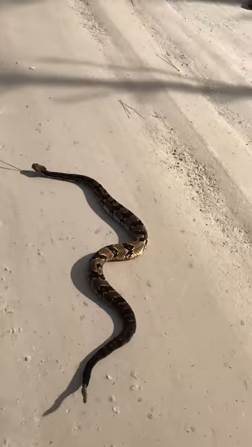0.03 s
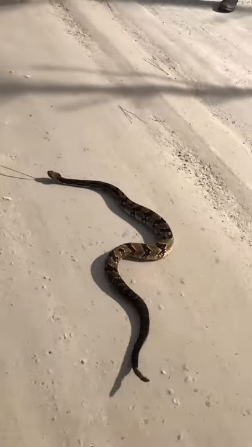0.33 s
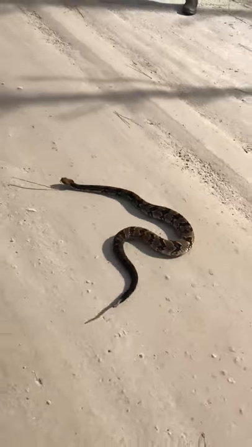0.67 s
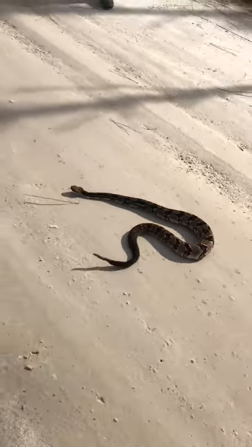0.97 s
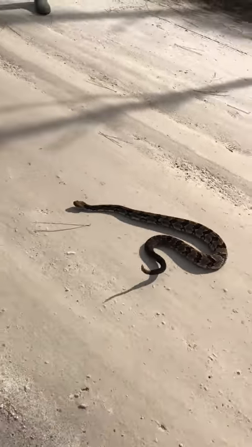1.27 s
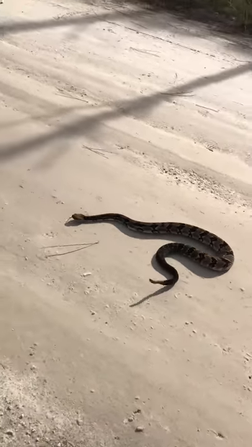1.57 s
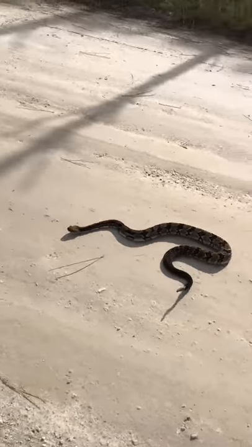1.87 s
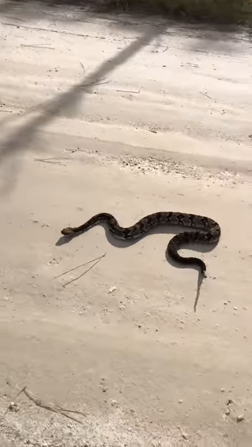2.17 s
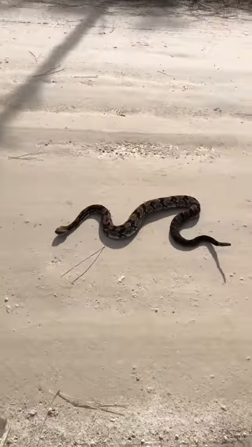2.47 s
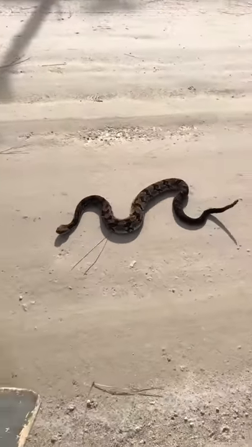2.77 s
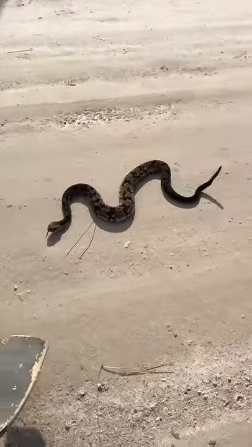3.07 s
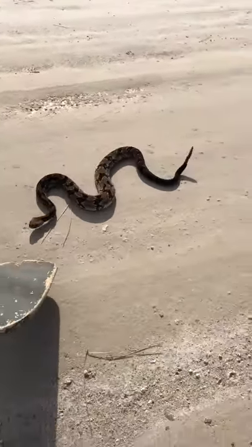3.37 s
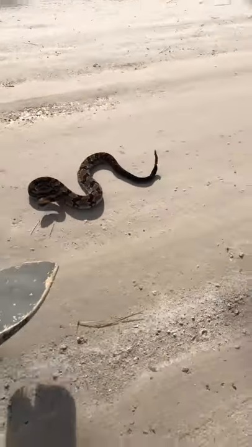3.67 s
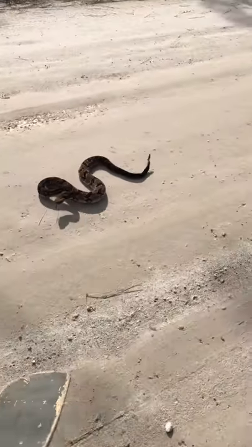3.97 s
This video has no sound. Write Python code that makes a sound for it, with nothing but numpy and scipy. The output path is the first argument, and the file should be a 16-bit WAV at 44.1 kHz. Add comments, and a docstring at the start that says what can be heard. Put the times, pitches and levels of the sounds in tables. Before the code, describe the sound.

A rattlesnake's rattle buzzes dry and high for the whole four seconds, its tone shifting slightly and easing a little near the end. An engine idles faintly underneath in the open air. Light scuffs on sand come at about 1.1, 1.9, 2.5 and 3.1 seconds. A few soft, dull knocks are scattered from 0.9 seconds on, the clearest near 1.5 and 3.7 seconds.

```python
"""Rattlesnake on a dirt road.

A rattlesnake buzzes its tail while it crawls and coils. At each turn of the tail the hollow
segments click together; their colour shifts with the tail's pose. An engine idles faintly nearby,
its beats ringing the exhaust. A few scuffs on the sand and soft knocks pass close by."""
import sys
import numpy as np
from scipy import signal
from scipy.fft import rfft, irfft, next_fast_len
from scipy.io import wavfile
from scipy.ndimage import uniform_filter1d, map_coordinates

SR = 44100
rng = np.random.default_rng(int(sys.argv[2]) if len(sys.argv) > 2 else 0)


def store_pcm(level_fs):
    """Save levels as 16-bit WAV."""
    pcm = np.round(np.clip(level_fs, -1, 1) * 32767).astype(np.int16)
    wavfile.write(sys.argv[1], SR, np.atleast_2d(pcm).T)


N = 176400

# dull body of disturbed sand (frequency [Hz], relative density [dB])
SAND_SPECTRUM = [(100, -18), (250, 9.5), (420, 13.5), (700, 7), (1100, 7), (1700, -11), (4000, -5),
                 (12000, -55)]


def amp(db):
    """Decibels to gain."""
    return 10 ** (np.asarray(db) / 20)


def unit(x):
    """Scale to rms 1."""
    return x / np.sqrt(np.mean(x ** 2) + 1e-20)


def along(points, hz):
    """(Hz, value) points on a log axis."""
    f, v = np.transpose(points)
    return np.interp(np.log(hz + 1), np.log(f + 1), v)


def curves(rows, t):
    """Each column after the time, read at the times t."""
    s, *cols = np.transpose(rows)
    return [np.interp(t, s, c) for c in cols]


def wobble(rate):
    """A smooth random curve, rate knots a second."""
    return map_coordinates(rng.standard_normal(int(N * rate / SR) + 4), [np.arange(N) * rate / SR])


def filtered(x, response):
    """x times a response of frequency."""
    m = next_fast_len(N + SR // 2)
    return irfft(rfft(x, m) * response(np.fft.rfftfreq(m, 1 / SR)), m)[:N]


def noise(spectrum):
    """Noise with the given dB per Hz."""
    return filtered(rng.standard_normal(N) * np.sqrt(SR / 2), lambda hz: amp(along(spectrum, hz)))


def pulses(times, sizes):
    """Impulses at the given times."""
    inside = (times >= 0) & (times < N / SR)
    return np.bincount((times[inside] * SR).astype(int), sizes[inside], N)[:N]


def fade(t, t60):
    """Exponential decay."""
    return np.exp(-np.log(1000) * t / t60)


def bell(hz, centre, octaves):
    """A bump of height 1 on a log frequency axis."""
    return np.exp(-.5 * (np.log2((hz + 1) / centre) / octaves) ** 2)


def segment_clicks(count):
    """Each tail stroke throws the segments together in turn, over the steady rub of their sliding."""
    # tail speed, two strokes per swing (time [s], stroke rate [Hz])
    tail_speed = [(0, 114), (.8, 114), (1.4, 110.5), (2.8, 108.5), (3.1, 111), (4, 109.5)]
    # spread of a stroke's clicks (time [s], rms spread [strokes])
    click_spread = [(0, 0.24), (1.2, 0.22), (2.5, 0.24), (3.2, .26), (4, 0.29)]
    attack_s, t60_s, rub_db = 0.00021, 0.0095, -3.5
    click_scatter_db, stroke_scatter_db, backstroke_db = 0.6, 1.7, -2.2
    t = np.arange(N) / SR
    rate_hz = curves(tail_speed, t)[0] + 1.566 * wobble(12)
    turns = np.cumsum(rate_hz) / SR
    stroke = np.arange(int(turns[-1]))[:, None]
    chance = np.clip(rng.standard_normal((len(stroke), 2 * count + 1)), -2, 2)
    spread, = curves(click_spread, np.interp(stroke, turns, t))
    order = unit(np.linspace(-1, 1, count))
    times_s = np.interp(stroke + spread * (order + 0.29 * chance[:, :count]), turns, t)
    db = click_scatter_db * chance[:, count:-1] + stroke_scatter_db * chance[:, -1:]
    db += backstroke_db * (stroke % 2)
    age = t[:SR // 50]
    envelope = fade(age, t60_s) * (1 - np.exp(-age / attack_s))
    power = signal.fftconvolve(pulses(times_s, amp(db) ** 2), envelope ** 2)[:N]
    clicks = unit(np.sqrt(abs(power)) * rng.standard_normal(N))
    return unit(clicks + amp(rub_db) * rng.standard_normal(N))


def rattle():
    """Clicks ring in the hollow segments; the tail's pose sets level, resonances and lower edge."""
    # tail pose (time [s], gain [dB], main resonance [dB], its centre [Hz], its width [oct],
    # upper resonance [dB], its centre [Hz], low mids [dB])
    pose = [(0.0, -33.5, 11.6, 5200, 0.36, 4, 7540.0, 1.5), (0.15, -33, 9.5, 5000, 0.35, 6.5, 7710.0, 2.5),
            (0.45, -34.5, 10, 5120, 0.38, 7, 7900, 3.5), (0.55, -34.5, 10.5, 5660, 0.33, 3, 8050, 4),
            (0.7, -35, 10.5, 5880.0, 0.28, 3, 8570.0, 6), (0.88, -33.0, 8, 5830, 0.22, 4, 8640.0, 5.5),
            (1.08, -33.5, 8.5, 5750, 0.27, 3.1, 9190.0, 3), (1.17, -32.5, 7.5, 6070, 0.21, -2, 8970.0, 1.5),
            (1.27, -33, 9.5, 4840.0, 0.29, 8, 8390.0, 1), (1.38, -33, 9.3, 4740.0, 0.52, 0, 8790.0, 0),
            (1.56, -34.5, 10.5, 5850, 0.21, 4, 8930.0, 1.6), (1.68, -34, 9.5, 5320.0, 0.28, 3.5, 8600, 3.8),
            (1.85, -32.5, 9, 5110.0, 0.39, 2, 7680.0, -4), (1.97, -36.5, 11.5, 5830.0, 0.28, 5.5, 9800, 3),
            (2.07, -32.5, 9.5, 5200, 0.44, 3, 8780.0, -3),
            (2.23, -34, 10.0, 5560.0, 0.31, 3.8, 8810.0, -0.53),
            (2.5, -33.5, 9.5, 4900.0, 0.44, 3.5, 8300.0, -4.5), (2.7, -35, 9, 5370, 0.36, 4.5, 8300, 2.5),
            (3.0, -34.5, 7.5, 4470, 0.36, 5.5, 7600, -3), (3.33, -39, 12, 5190.0, 0.23, 7.0, 8040.0, 2.5),
            (3.68, -34.5, 10, 5270, 0.22, 5.5, 8570.0, 1.5), (3.81, -37, 6.5, 5500, 0.23, 5.5, 8300, 6),
            (4.0, -37.5, 5, 5910.0, 0.26, 8, 8200, 5.5)]
    # segment response (frequency [Hz], gain [dB])
    shell = [(300.0, -48), (900.0, -15), (1700.0, -11), (2600.0, -7.5), (3300.0, -2.5), (4000.0, -1.45),
             (5500.0, -0.79), (6900.0, -0.6), (9000.0, -2.5), (11700.0, -4), (13500.0, -0.8),
             (17000.0, -1.5)]
    # narrow treble peak, sinking as the snake coils (time [s], centre [Hz], gain [dB])
    sizzle = [(0.1, 12520.0, 2.5), (0.6, 11800.0, 5), (0.95, 9960.0, 2.5), (1.25, 9800, 2),
              (1.7, 10600.0, 4.2), (2.2, 10200.0, 0.31), (2.7, 11370.0, 1.5)]
    # sliding band below that peak, mostly a dip (time [s], centre [Hz], gain [dB])
    hollow = [(0.2, 10500, -1.5), (0.6, 8750.0, -1), (0.95, 8460.0, -0.63), (1.5, 7330.0, 1.5),
              (2.1, 6710.0, -3), (2.8, 7120.0, -2.7), (3.33, 6810.0, -3.5), (3.8, 6630.0, 0.5)]
    # lower edge of the buzz (time [s], frequency [Hz])
    edge = [(0.0, 3640.0), (0.45, 3650.0), (0.85, 4270.0), (1.05, 3850), (1.2, 3590.0), (1.35, 2640.0),
            (1.55, 3430), (2.1, 3470.0), (2.6, 3150.0), (3.05, 3840), (3.68, 3750.0), (3.83, 2560.0),
            (4.0, 3070)]
    # bursts of harder shaking (time [s], boost [dB])
    bursts = [(.12, 1.9), (.22, 0.5), (.44, 1.5), (.67, 1.2), (.86, 1.4), (1.1, 2), (2.9, 1), (3.18, 1.1)]
    edge_db, edge_oct, burst_s = 3, 0.17, 0.027
    ripple_db, ripple_hz, ripple_s = 1.09, 348.3, 0.1
    click_colour_db, surge_db = 0.5, 0.25
    hz, t, spectrum = signal.stft(segment_clicks(count=5), SR, nperseg=256, noverlap=192)
    hz = hz[:, None]
    gain_db, ring_db, ring_hz, ring_oct, upper_db, upper_hz, low_db = curves(pose, t)
    db = gain_db + along(shell, hz) + ring_db * bell(hz, ring_hz, ring_oct)
    db += upper_db * bell(hz, upper_hz, octaves=0.15)
    db += low_db * bell(hz, 2500, octaves=0.6)
    for track, width_oct in (sizzle, 0.16), (hollow, 0.072):
        centre_hz, height_db = curves(track, t)
        db += height_db * bell(hz, centre_hz, width_oct)
    above_edge = np.log2((hz + 1) / curves(edge, t)[0]) / edge_oct
    db += edge_db * above_edge * np.exp(-0.5 * above_edge ** 2)
    db += sum(boost_db * np.exp(-0.5 * ((t - at_s) / burst_s) ** 2) for at_s, boost_db in bursts)
    # small peaks drift through the colour
    knots = np.array(np.broadcast_arrays(hz / ripple_hz, t / ripple_s))
    db += ripple_db * map_coordinates(rng.standard_normal((100, 100)), knots, mode="mirror")
    # each click rings with its own colour
    colour = uniform_filter1d(rng.standard_normal(spectrum.shape), size=9, axis=0)
    db += click_colour_db * unit(uniform_filter1d(colour, size=3, axis=1))
    buzz = signal.istft(spectrum * amp(db), SR, nperseg=256, noverlap=192)[1][:N]
    return buzz * amp(surge_db * wobble(rate=16))


def engine():
    """Idle beats ring the exhaust over a few slightly unsteady tones."""
    # exhaust resonances (frequency [Hz], relative level [dB], t60 [s])
    exhaust = [(111.1, -2.5, 0.15), (157, -3.5, 0.078), (190.6, 0.5, 0.034)]
    # engine tones (frequency [Hz], rms level [dB])
    tones = [(36.6, -72), (50.3, -61.5), (110.5, -65), (160, -55.5), (185, -61.5), (368, -66.5), (384, -66)]
    idle_hz, first_beat_s, wander_s, jitter_s = 13.72, 0.043, 0.00063, 0.0008
    throb_db, scatter_db, attack_s = -47, 1.5, 0.012
    t = np.arange(N) / SR
    beats_s = np.arange(first_beat_s, N / SR, 1 / idle_hz)
    beats_s += wander_s * np.interp(beats_s, t, wobble(2.027))
    age, throb = t[:SR // 3], 0
    for hz, db, t60_s in exhaust:
        times_s = beats_s + rng.normal(0, jitter_s, len(beats_s))
        sizes = amp(db + rng.normal(0, scatter_db, len(beats_s)))
        ring = np.sin(2 * np.pi * hz * age) * fade(age, t60_s) * (1 - np.exp(-age / attack_s))
        throb += signal.fftconvolve(pulses(times_s, sizes), ring)[:N]
    hum = sum(amp(db) * unit(np.sin(2 * np.pi * hz * t + 0.5 * wobble(3.55))) for hz, db in tones)
    return amp(throb_db) * unit(throb) + hum


def open_air():
    """Steady noise of engine rumble and open air."""
    # rumble and air (frequency [Hz], density [dB/Hz])
    air_spectrum = [(22, -125), (38, -88), (60, -74), (80, -79), (110, -72), (170, -67.5), (230, -75.5),
                    (300, -85.5), (400, -82.5), (520, -90), (750, -93.5), (1100, -89), (2000, -94.5),
                    (8000, -102)]
    return noise(air_spectrum)


def scuffs():
    """Over faint shuffling, each scuff swells and fades: dull sandy body, brighter uneven grit."""
    # shuffling on the sand (time [s], level [dB])
    shuffle = [(0, -75), (.7, -70), (1.1, -61), (2.3, -59), (3.1, -55), (4, -55)]
    # scuffs (peak time [s], rise [s], fall [s], body [dB], grit [dB])
    swells = [(1.14, .026, 0.042, -53, -49), (1.862, 0.028, 0.046, -45.5, -40),
              (2.126, .005, .05, -48, -60), (2.43, 0.11, .072, -44.5, -52), (2.486, 0.042, 0.04, -44, -41),
              (2.558, 0.05, 0.032, -45, -41), (3.066, .0056, .037, -43.5, -44.5)]
    # grit (frequency [Hz], relative density [dB])
    grit_spectrum = [(500, -9), (1300, -12), (2500, -0.5), (3200, -0.5), (4200, -7), (9000, -23),
                     (16000, -29)]
    body_rough_db, grit_rough_db, shuffle_rough_db = 0.71, 3.5, 3.1
    t = np.arange(N) / SR
    body = unit(noise(SAND_SPECTRUM) * amp(body_rough_db * wobble(200)))
    grit = unit(noise(grit_spectrum) * amp(grit_rough_db * wobble(400)))
    shuffling = unit(noise(SAND_SPECTRUM) * amp(shuffle_rough_db * wobble(25.11)))
    out = amp(curves(shuffle, t)[0]) * shuffling
    for peak_s, rise_s, fall_s, body_db, grit_db in swells:
        swell = np.exp(-2 * ((t - peak_s) / np.where(t < peak_s, rise_s, fall_s)) ** 2)
        out += swell * (amp(body_db) * body + amp(grit_db) * grit)
    return out


def knocks():
    """Soft, quickly damped thumps whose pitch drops within a few cycles."""
    # thumps (time [s], gain [dB], starting pitch [Hz], t60 [s], pitch lost [fraction])
    thumps = [(.855, -36.5, 520, 0.029, 0.24), (.987, -39, 770, 0.025, 0.11), (1.049, -47, 760, .036, .05),
              (1.136, -38, 450, 0.038, 0.33), (1.544, -30, 310, 0.043, .45),
              (1.645, -34.5, 500, 0.022, 0.45), (1.842, -38, 490, .05, 0.076),
              (1.856, -30, 560, 0.017, 0.41), (2.664, -36.5, 310, 0.057, 0.39),
              (3.688, -26.5, 450, 0.027, 0.51)]
    attack_s, sag_s = 0.0028, 0.0044
    t, out = np.arange(N) / SR, 0
    roughness = 0.099 * unit(noise(SAND_SPECTRUM))
    for start_s, db, hz, t60_s, sag in thumps:
        age = np.maximum(t - start_s, 0)
        cycles = hz * ((1 - sag) * age + sag * sag_s * (1 - np.exp(-age / sag_s)))
        envelope = 2 * fade(age, t60_s) * (1 - np.exp(-age / attack_s))
        out += amp(db) * (np.sin(2 * np.pi * cycles) + roughness) * envelope
    return out


def scene():
    """Snake, engine and small noises in the open air, mono."""
    return (rattle() + engine() + open_air() + scuffs() + knocks())[None, :]


def record(dry):
    """Brick-wall low-pass."""
    top_hz = 17400
    return np.array([filtered(x, lambda hz: hz < top_hz) for x in dry])


dry = scene()
out = record(dry)
store_pcm(out)
```